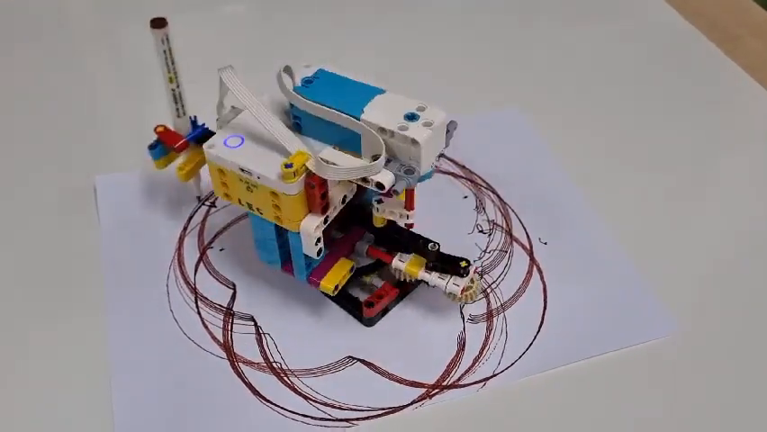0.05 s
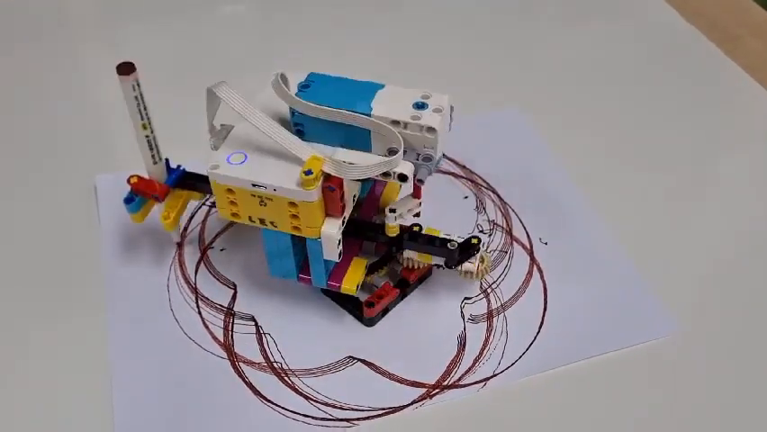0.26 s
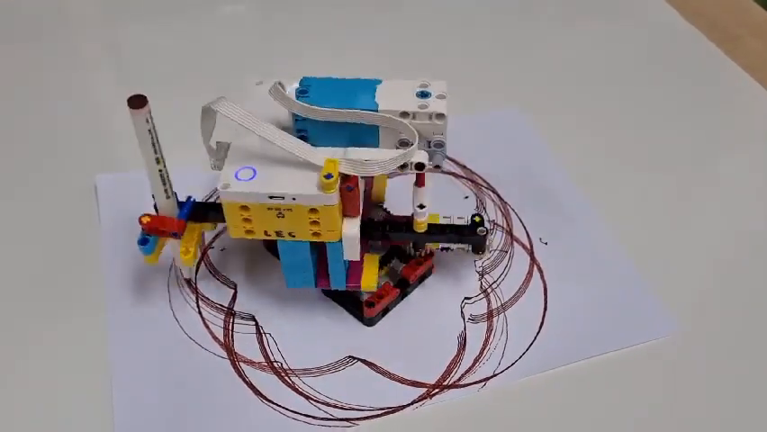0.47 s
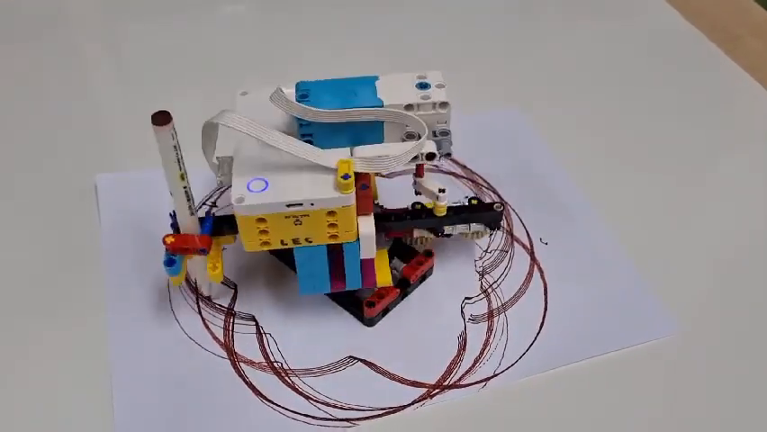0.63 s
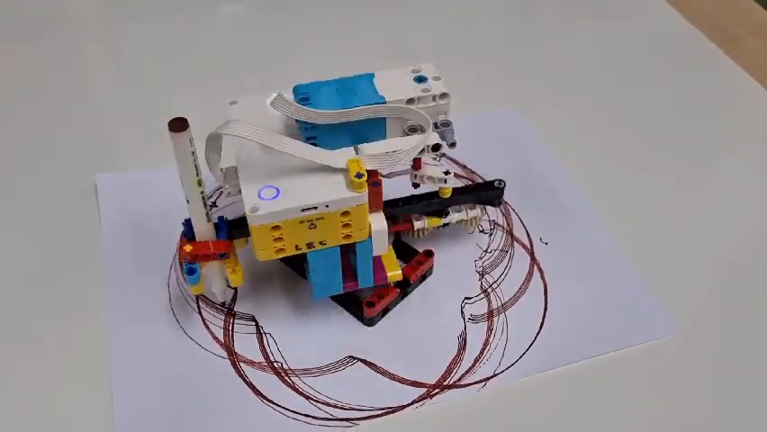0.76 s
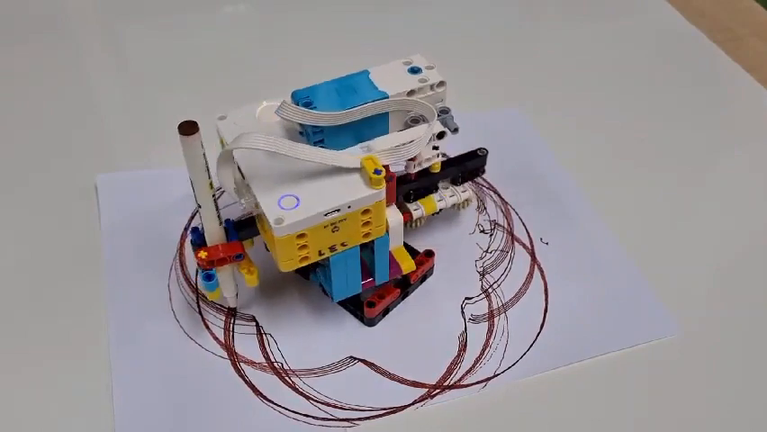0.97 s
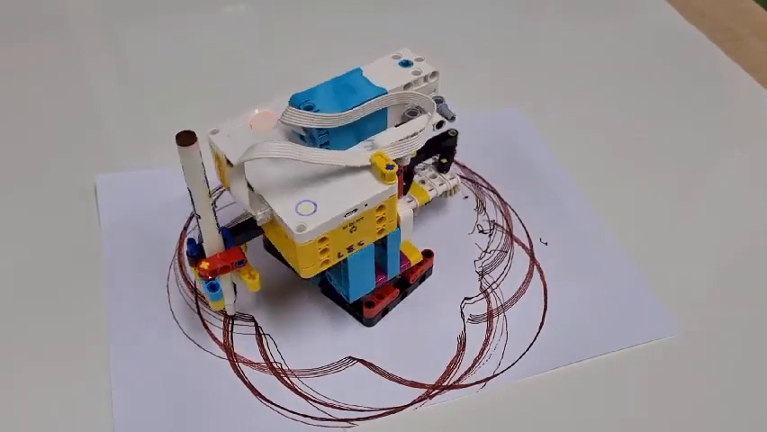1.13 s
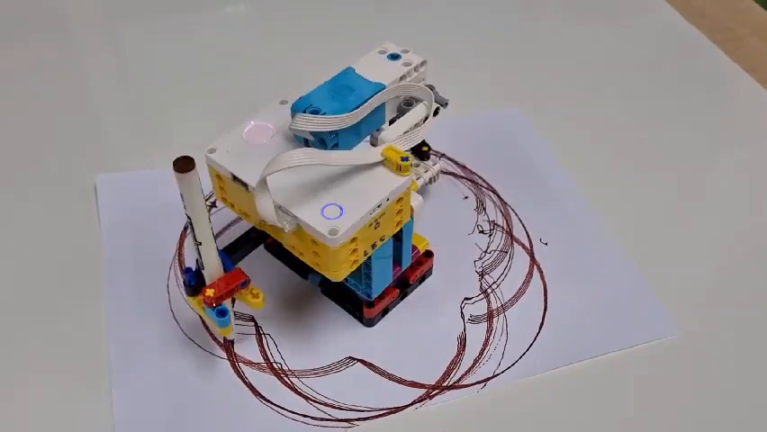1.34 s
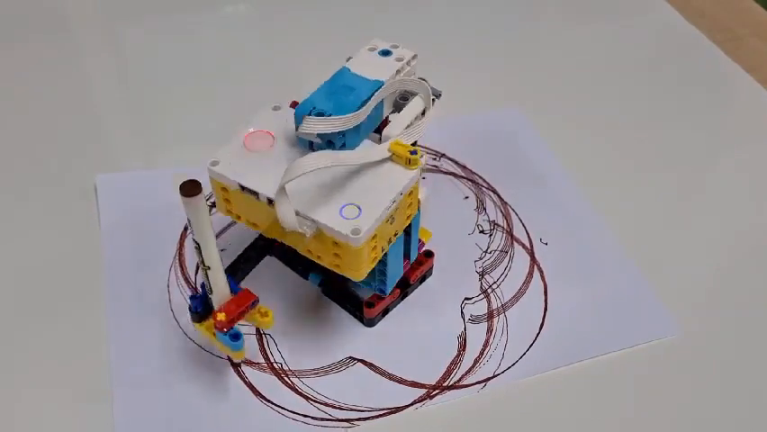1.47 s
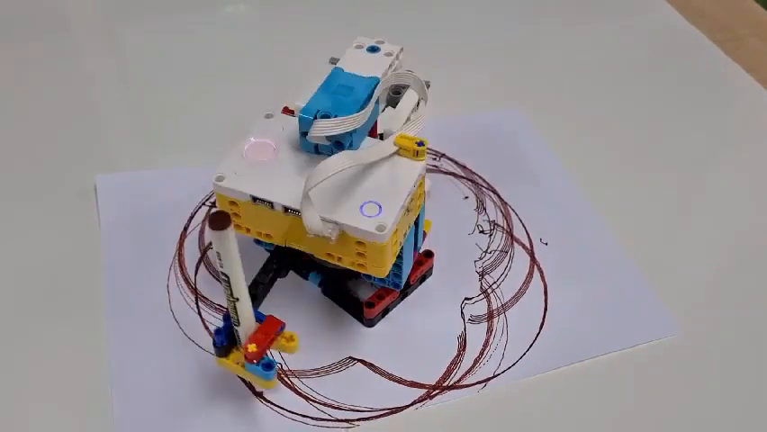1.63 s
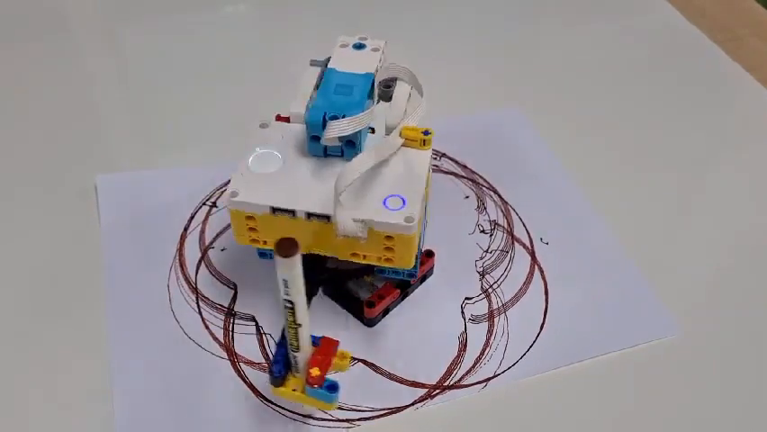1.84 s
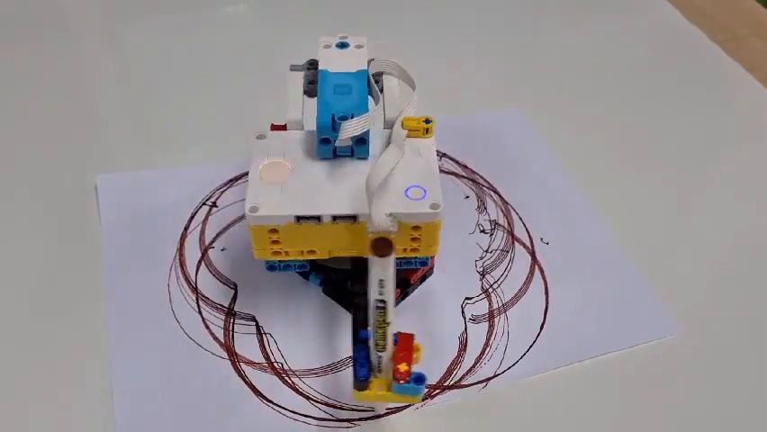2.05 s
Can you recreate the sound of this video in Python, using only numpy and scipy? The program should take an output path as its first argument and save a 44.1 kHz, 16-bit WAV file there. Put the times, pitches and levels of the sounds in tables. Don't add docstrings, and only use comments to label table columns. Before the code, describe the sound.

A small electric motor whines continuously with a buzzing, slightly wavering pitch as plastic linkage parts clack, hardest in the first 0.7 seconds, then softer; close stereo microphone, lively hard room, faint low ventilation hum.

```python
import sys
import numpy as np
from scipy import signal
from scipy.fft import rfft, irfft, next_fast_len
from scipy.io import wavfile
from scipy.ndimage import uniform_filter1d, map_coordinates

SR = 44100
rng = np.random.default_rng(int(sys.argv[2]) if len(sys.argv) > 2 else 0)


def pcm_store(signal):
    levels = np.round(np.clip(np.atleast_2d(signal), -1, 1) * 32767)
    wavfile.write(sys.argv[1], SR, levels.astype(np.int16).T)


def invert_db(level):
    return 10 ** (np.asarray(level, dtype=float) / 20)


N = 92610


def unit(x):
    return x / np.sqrt(np.mean(x ** 2) + 1e-20)


def along(points, hz):
    f, v = np.transpose(points)
    return np.interp(np.log(hz + 1), np.log(f + 1), v)


def wobble(rate):
    knots = rng.standard_normal(int(N * rate / SR) + 4)
    return map_coordinates(knots, [np.arange(N) * rate / SR])


def filtered(x, response):
    m = next_fast_len(x.shape[-1] + 8192)
    spectrum = rfft(x, m) * response(np.fft.rfftfreq(m, 1 / SR))
    return irfft(spectrum, m)[..., :x.shape[-1]]


def resonant(peaks, f):
    total = 0
    for k, (centre, width, db) in enumerate(peaks):
        mode = 1j * f * width / (centre * centre - f * f + 1j * f * width)
        total = total + (-1) ** k * invert_db(db) * mode
    return total


def causal(gain):
    cepstrum = irfft(np.log(gain + 1e-6))
    half = len(cepstrum) // 2
    cepstrum[1:half] *= 2
    cepstrum[half + 1:] = 0
    return np.exp(rfft(cepstrum))


def evened(x, width_hz):
    z = rfft(x)
    bins = int(width_hz * x.shape[-1] / SR) + 1
    power = uniform_filter1d(np.abs(z) ** 2, size=bins, axis=-1)
    return irfft(z / np.sqrt(power + 1e-12), x.shape[-1])


def spread(pair, alike, lag_s):
    def mid_side(hz):
        angle = np.arccos(np.clip(along(alike, hz), -1, 1)) / 2
        return np.array([np.cos(angle), np.sin(angle)])

    mid, side = filtered(pair, mid_side)
    lags = np.array([[0], [lag_s]])
    return filtered(np.array([mid + side, mid - side]), lambda hz: np.exp(-2j * np.pi * hz * lags))


# (frequency [Hz], likeness [0-1])
AIR_ALIKE = [(60, 0.98), (200, 0.98), (400, 0.51), (700, 0.1), (2400, 0.21), (8000, 0.142)]


def rush(gain, patchy_db):
    z = signal.stft(rng.standard_normal((2, N)), nperseg=512)[2]
    field = uniform_filter1d(rng.standard_normal(z.shape[1:]), size=5, axis=0)
    field = uniform_filter1d(field, size=10, axis=1)
    pair = signal.istft(z * invert_db(patchy_db * unit(field)), nperseg=512)[1][:, :N]
    return unit(spread(filtered(pair, gain), AIR_ALIKE, lag_s=.00016))


# (frequency [Hz], density [dB per Hz])
HUM = [(15, -84), (25, -19), (108, -6.5), (139, -8.5), (172, 1.5), (237, -7), (270, -8), (297, -6.5),
       (600, -14), (780, -77), (1320, -120)]
# (frequency [Hz], density [dB per Hz])
HISS = [(260, -70), (450, -17), (972, -12.5), (1210, -12.5), (2190, -11), (2430, -9), (3970, -20.5),
        (6100, -20), (15500, -21)]


def air():
    t = np.arange(N) / SR
    drone_level = invert_db(-63.5 + 0.31 * wobble(17.6)) * np.sqrt(2)
    drone = drone_level * np.sin(2 * np.pi * 42 * t + 0.27 * wobble(4.746))
    hum = invert_db(-53.5 + 0.4 * wobble(4)) * rush(lambda f: invert_db(along(HUM, f)), patchy_db=1.0)
    hiss = invert_db(-57 + 0.63 * wobble(5.3)) * rush(lambda f: invert_db(along(HISS, f)), patchy_db=3.5)
    return drone + hum + hiss


# (time [s], shaft speed [Hz], whine level [dB])
SHAFT = [(0, 65.5, -12.5), (0.299, 66.4, -4), (.8, 63.25, -6), (0.952, 62, -4), (1.099, 67.52, -2),
         (1.451, 70.45, 1.5), (1.6, 65, -2.5), (1.72, 68.5, -1.5), (1.83, 62.4, -2.5), (1.951, 70.45, -4.5),
         (2.1, 69.4, -1.5)]
# (switching multiple [-], shaft order [-], rms level [dB], left lead [rad], left-right [dB])
WHINE = [
    (1, -1, -70, 1.7, -1.5),
    (1, 0, -59.5, .8, -1),
    (1, 1, -61.5, 1.6, -3),
    (2, -1, -68.5, 1.6, -2),
    (2, 0, -59.5, 1.8, -4),
    (2, 1, -58.5, 1.9, -4.4),
    (2, 2, -76, 2, -4),
]
# (frequency [Hz], width [Hz], level [dB])
HOUSING = [
    (759.3, 190, -0.5),
    (1220, 254, 0.5),
    (2585, 340, 0),
]


def motor():
    switch_hz = 1200
    t = np.arange(N) / SR
    s, hz, db = np.transpose(SHAFT)
    load = np.interp(t, s, db)
    shaft_hz = np.interp(t, s, hz) + 0.29 * wobble(5.5)
    turn = 2 * np.pi * np.cumsum(shaft_hz) / SR
    drift = 0.069 * wobble(5.1)
    ear = np.array([[.5], [-.5]])
    whine = 0
    for multiple, order, level, lead, pan in WHINE:
        growth = 1 if order else 0.72
        ear_wobble = 0.47 * np.array([wobble(7.5), wobble(7.22)])
        tone_db = level + ear * pan + load * growth + wobble(7.1) + ear_wobble
        phase = multiple * (2 * np.pi * switch_hz * t + drift) + order * turn + ear * lead
        whine = whine + invert_db(tone_db) * np.sqrt(2) * np.sin(phase)
    gears = rush(lambda f: resonant(HOUSING, f) ** 2, patchy_db=0.0)
    gears = gears * (1 + 0.33 * np.cos(turn))
    return whine + invert_db(-59 + .15 * load + 0.5 * wobble(5.6)) * gears


# (frequency [Hz], T60 [s])
ROOM = [(150, 0.38), (500, 0.38), (1500, 0.4), (3000, 0.35), (6000, 0.32), (14000, 0.37)]
# (frequency [Hz], likeness [0-1])
ROOM_ALIKE = [(100, 1), (300, 1), (600, 0.41), (1500, 0.61), (3000, 0.24), (8000, 0.2)]


def room_tail():
    n = SR // 2
    hz, t, z = signal.stft(rng.standard_normal((2, n)), SR, nperseg=256)
    decay = invert_db(-60 * t / along(ROOM, hz)[:, None])
    tail = signal.istft(z * decay, SR, nperseg=256)[1][:, :n]
    tail = tail * np.clip(np.arange(n) / (0.005 * SR), 0, 1)
    tail = tail / np.sqrt(np.mean(np.sum(tail ** 2, axis=1)))
    tail[0, 0] += invert_db(-7)
    return spread(evened(tail, width_hz=470), ROOM_ALIKE, lag_s=0.0002823)


def contacts(db, length):
    when = np.cumsum(rng.exponential(1 / 1400, size=120))
    when = when - when[0]
    size = invert_db(3 * rng.standard_normal(size=120)) * np.sign(rng.standard_normal(size=120))
    size = size * np.clip((1.128 * length - when) / (0.75 * length + 1e-4), 0, 1)
    if db > -42:
        size = size * invert_db(7 * np.exp(-when / .005))
    else:
        size = size * np.clip(0.53 + when / (.5 * length), 0, 1)
    n = SR // 10
    return np.bincount(np.minimum(when * SR, n - 1).astype(int), size, n)


# (frequency [Hz], density [dB per Hz])
PLASTIC = [(60, -33), (110, -39), (240, -13), (550, -12.5), (900, -9), (2800, -12.5), (4100, -25.5),
           (15500, -17.5)]
# (frequency [Hz], width [Hz], level [dB])
SHELL = [(230, 39, -5), (786, 288, -5), (1040, 87, -2), (1296, 550, -10), (1760, 140, 0.5),
         (2325, 485, 0.5), (2876, 196, 2.5), (3887, 750, 2), (7070, 4500, -11.5), (12600, 1330, -17.5)]
# (time [s], frequency [Hz], width [Hz], level over the shell [dB])
STRUCK = [(.208, 1010, 397, 10.5), (.208, 210, 79, 12), (.399, 915, 345, -5.5), (.444, 1880, 865, 2),
          (.444, 4160, 386, 4), (.444, 1006, 250, 2.5), (.673, 1220, 493, 6), (.673, 230, 100, 7),
          (.673, 3700, 197, -11), (1.77, 1140, 500, 4)]


def shell_ring(train, s, db, tilt, fizz):
    shift, gain = rng.standard_normal((2, len(SHELL)))
    shell = [(centre * np.exp(.03 * k), width, level + 1.5 * r)
             for (centre, width, level), k, r in zip(SHELL, shift, gain)]
    part = [row[1:] for row in STRUCK if abs(row[0] - s) < .007]

    def body(f):
        slope = tilt * np.log2(np.clip(f, 1200, 4000) / 1200)
        treble = fizz / (1 + (4000 / (f + 1)) ** 6)
        thud = 0.19 * (db + 45) / (1 + (f / 500) ** 4)
        colour = invert_db(along(PLASTIC, f) + slope + treble + thud)
        return causal(colour * np.abs(resonant(shell, f)) ** .6)

    def part_and_lag(f):
        low = 1 / (1 + (f / 3300) ** 8)
        late_high = np.exp(-2j * np.pi * f * .005) / (1 + (3300 / (f + 1)) ** 8)
        return (1 + resonant(part, f)) * (low + late_high)

    return filtered(filtered(evened(train, width_hz=370), body), part_and_lag)


# (time [s], level [dB], rattle length [s], tilt over 1.2 kHz [dB per octave], fizz over 4 kHz [dB])
CLACKS = [(0.096, -53.5, .01, -2, -3), (0.187, -50, 0.024, 1, -1), (.208, -34, .014, -1, -5.5),
          (0.378, -55.5, 0.015, 3, 7), (0.399, -31, 0.013, -2, -3), (0.446, -27, 0.012, 0.5, 6.5),
          (0.599, -45, .03, 4, -9), (0.634, -43.5, 0.029, -3, -10), (0.672, -26, 0.033, -0.5, 2),
          (0.913, -44.5, 0.028, 0.5, 4), (1.031, -52.5, .02, -13.5, -10), (1.417, -55, .03, -18, 0),
          (1.655, -44.5, 0.022, -1, 2), (1.769, -48.5, 0.0078, -1, -13), (1.959, -53, .02, -9.5, 16)]


def clacks():
    out = np.zeros((2, N + 2 * SR))
    for s, db, length, tilt, fizz in CLACKS:
        hit = shell_ring(contacts(db, length), s, db, tilt, fizz)
        wet = signal.fftconvolve(hit[None], room_tail(), axes=1)
        wet = wet / np.sqrt(np.mean(wet[:, :SR // 20] ** 2))
        out[:, int(s * SR):][:, :wet.shape[1]] += invert_db(db) * wet
    return out[:, :N]


def scene():
    right_db = 1.5
    pan = invert_db([[-right_db / 2], [right_db / 2]])
    return air() + motor() + clacks() * pan


def band_limit(x):
    return signal.sosfilt(signal.butter(12, 15710, fs=SR, output="sos"), x)


def record(dry):
    mix = filtered(dry, lambda hz: hz < 15650)
    return band_limit(mix)


dry = scene()
out = record(dry)
pcm_store(out)
```